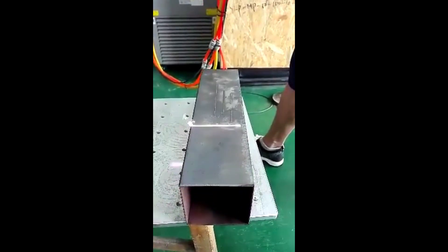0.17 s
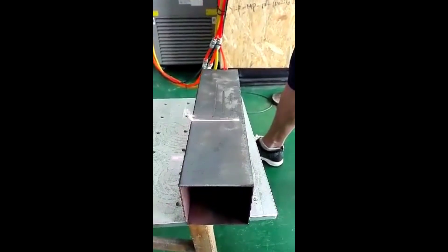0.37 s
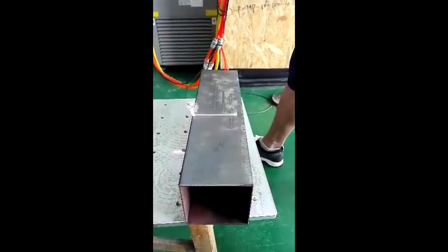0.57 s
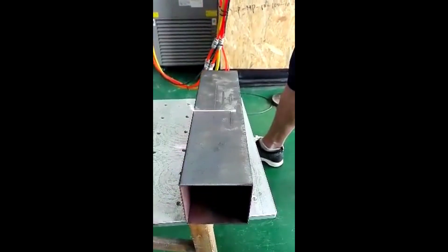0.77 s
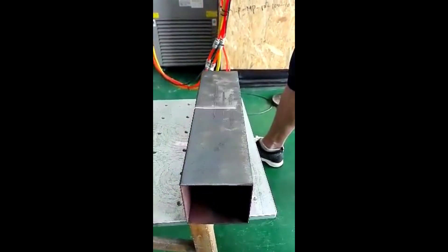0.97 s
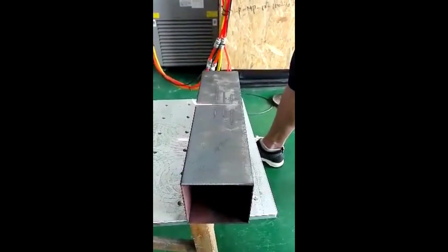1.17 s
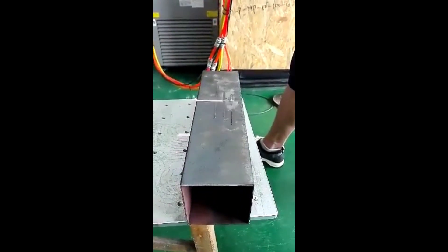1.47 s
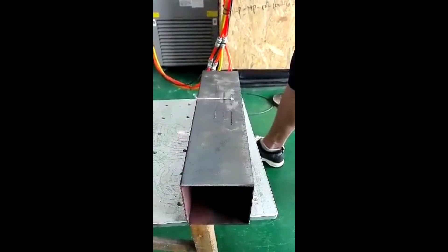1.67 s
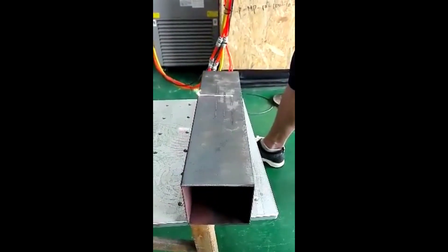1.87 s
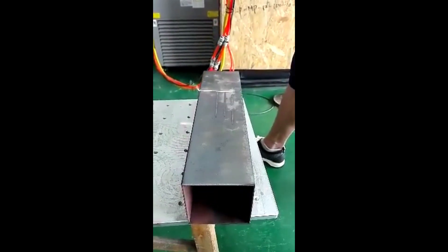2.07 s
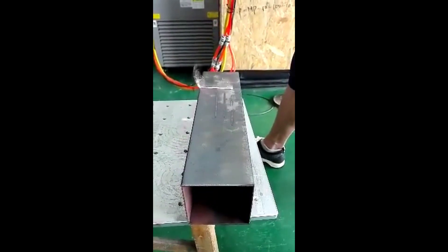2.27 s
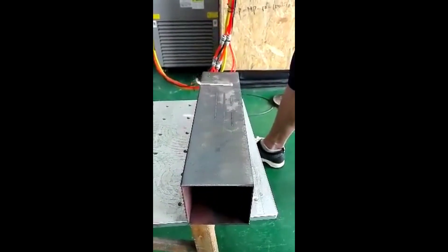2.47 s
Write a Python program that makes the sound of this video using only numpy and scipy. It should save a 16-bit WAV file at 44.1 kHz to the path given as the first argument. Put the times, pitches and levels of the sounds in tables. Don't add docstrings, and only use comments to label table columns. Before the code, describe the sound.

A laser cleaning a square steel tube buzzes continuously for about 2.6 seconds, a rapid low-pitched rasp of crackling snaps, with bright sizzle and a faint very high whine. It swells early, drops sharply near 0.95, returns abruptly around 1.0, dips again near 1.7 and 2.0, then stays strong to the end, ringing more metallically. A cooling fan roars steadily behind in the workshop.

```python
import sys
import numpy as np
from scipy import signal
from scipy.fft import rfft, irfft, dct, next_fast_len
from scipy.io import wavfile
from scipy.ndimage import uniform_filter1d

SR = 44100
rng = np.random.default_rng(int(sys.argv[2]) if len(sys.argv) > 2 else 0)


def master(y):
    cut = np.clip(np.atleast_2d(y).T, -1, 1)
    pcm = np.round(cut * 32767)
    wavfile.write(sys.argv[1], SR, pcm.astype(np.int16))


def invert_db(level):
    return 10 ** (np.asarray(level, dtype=float) / 20)


N = 115542
PAD = next_fast_len(N + 4096)
HZ = np.maximum(np.arange(PAD // 2 + 1) * SR / PAD, 1)
TIME = np.arange(N) / SR
ALONG = TIME / TIME[-1]
SWEEP_HZ, PULSE_HZ = 94.73, 13995.5
CUTOFF_HZ = 14230


def rms_one(x):
    return x / np.sqrt(np.mean(x ** 2) + 1e-20)


def at_hz(points):
    hz, level_db = np.transpose(points)
    return np.interp(np.log(HZ), np.log(hz), level_db)


def filtered(x, response):
    return irfft(rfft(x, PAD) * response, PAD)[..., :N]


def causal(db):
    cepstrum = irfft(np.log(invert_db(db)), PAD)
    cepstrum[..., 1:PAD // 2] *= 2
    cepstrum[..., PAD // 2 + 1:] = 0
    return np.exp(rfft(cepstrum))


def coloured(x, spectrum):
    # (frequency [Hz], difference [dB])
    left_lean = [(60, -1.5), (130, 0), (290, 0), (640, 2), (1400, -2), (3070, 0), (6730, 10), (14800, 2.5)]
    lean_db = at_hz(left_lean) * [[.5], [-.5]]
    out = filtered(x, causal(at_hz(spectrum) + lean_db))
    return out / np.sqrt(np.mean(out.mean(axis=0) ** 2))


def drift(rate_hz, channels=1):
    noise = rng.standard_normal((channels, PAD))
    return rms_one(filtered(noise, 1 / (1 + (HZ / rate_hz) ** 2)))


def about_mean(curve):
    level_db = np.interp(TIME, *np.transpose(curve))
    return level_db - level_db.mean()


def fan():
    # (frequency [Hz], level [dB])
    air_colour = [(25, -7), (70, -6.5), (130, -0.5), (220, -5), (400, -14), (600, -16), (1500, -11),
                  (2500, -12.5)]
    # (frequency [Hz], correlation [-1 to 1])
    likeness = [(130, 1), (290, 0.87), (600, -0.42), (1400, .05)]
    # (frequency [Hz], width [Hz], level [dB])
    cabinet_hum = [(110.5, 12, -40.5), (159.4, 24, -42.5), (831, 100, -47)]
    # (time [s], level [dB])
    gusts = [(0.0, -35), (0.02, -32), (0.58, -33.5), (0.6, -36), (0.81, -28), (0.87, -32), (1.12, -32.5),
             (1.2, -33), (1.37, -32), (1.83, -32.5), (1.87, -30.5), (1.92, -33), (2.44, -33), (2.47, -31),
             (2.49, -32), (2.62, -36.5)]
    roar_db, hiss_db, cut_hz = -29.5, -26, 4210
    gust_share, gust_top_hz = 0.88, 298

    mid, side = rng.standard_normal((2, PAD))
    alike = np.clip(at_hz(likeness), -1, 1)
    air = filtered(mid, np.sqrt(1 + alike)) + filtered(side, np.sqrt(1 - alike)) * [[1], [-1]]
    air = filtered(air, invert_db(hiss_db) + 1 / (1 + (HZ / cut_hz) ** 6))
    roar = invert_db(roar_db) * coloured(air, air_colour)
    for hz, width_hz, level_db in cabinet_hum:
        hum = filtered(rng.standard_normal(PAD), 1 / (1 + (2 * (HZ - hz) / width_hz) ** 2))
        roar = roar + invert_db(level_db) * rms_one(hum)
    bass = filtered(roar, 1 / (1 + (HZ / gust_top_hz) ** 4))
    return roar + bass * (invert_db(gust_share * about_mean(gusts)) - 1)


def pulse_whine():
    # (time [s], level [dB])
    whine_level = [(0.0, -42), (0.25, -40.5), (0.32, -36), (0.56, -42.5), (0.61, -49), (0.81, -36),
                   (0.87, -45), (1.6, -49), (1.73, -49), (1.77, -46), (1.95, -37), (1.99, -53), (2.03, -41),
                   (2.22, -42), (2.25, -47), (2.31, -44), (2.56, -38.5), (2.62, -50)]
    # (multiple of the sweep rate [1], level [dB])
    sidebands = [
        (-1, -13),
        (1, -14),
        (2, -19),
    ]
    wander_depth, wander_hz = .35, 25.5
    left_db, right_db = -33, -45

    carrier = np.exp(2j * np.pi * PULSE_HZ * TIME)
    throb = 1 + sum(invert_db(db) * np.exp(2j * np.pi * k * SWEEP_HZ * TIME) for k, db in sidebands)
    chance = drift(wander_hz, channels=4)
    wander = 1 + wander_depth * (chance[:2] + 1j * chance[2:])
    tone = (carrier * throb * wander).real * invert_db([[left_db], [right_db]])
    return invert_db(about_mean(whine_level)) * tone


def burn():
    # (time [s], level [dB])
    burn_level = [(0.0, -41.5), (0.17, -34.5), (0.36, -34.5), (0.57, -31), (0.66, -37), (0.811, -35.5),
                  (0.888, -47), (0.959, -52), (1.019, -32.5), (1.36, -40.5), (1.4, -37.5), (1.52, -34.5),
                  (1.72, -49), (1.778, -31.5), (1.951, -34), (2.0, -44), (2.21, -32.5), (2.62, -30)]
    # (time [s], half length [s], level [dB])
    spots = [(0.202, 0.023, -6), (0.241, .018, 6), (.53, 0.042, 1), (0.774, 0.017, -1),
             (1.191, 0.041, -0.5), (1.513, 0.018, 2), (1.615, .03, 1), (2.042, 0.0089, 2.5),
             (2.136, 0.02, 2), (2.247, 0.024, -1.5), (2.401, .03, 3.5), (2.491, 0.011, 3),
             (2.57, 0.025, 3.5)]
    flicker_db, flicker_hz = 1.0, 16

    s, level_db = np.transpose(burn_level)
    mean_db = level_db.mean()
    spots_db = sum(db * np.exp(-((TIME - at) / half) ** 2) for at, half, db in spots)
    swing_db = np.interp(TIME, s, level_db) - mean_db + spots_db
    return mean_db, swing_db + flicker_db * drift(flicker_hz), spots_db


def surface(fresh):
    memory_sweeps = 14.0
    kept = np.exp(-1 / memory_sweeps)
    comb = 1 / (1 - kept * np.exp(-2j * np.pi * HZ / SWEEP_HZ))
    pattern = rms_one(filtered(rng.standard_normal((2, PAD)), comb))
    return np.sqrt(1 - fresh ** 2) * pattern + fresh * rng.standard_normal((2, N))


def edge_snaps():
    # (time [s], place in the sweep [s])
    far_edge = [(0, .0096), (.45, .00971), (.95, .00968), (1.3, .00974), (1.75, .00981), (1.95, .00981),
                (2.3, .00967), (2.62, .00963)]
    # (time [s], place in the sweep [s])
    near_edge = [(0, .00763), (.35, .0076), (.55, .00745), (1.1, .00743), (1.35, .00723), (1.74, .00706),
                 (1.78, .00692), (1.97, .00694), (2.03, .00707), (2.62, .00722)]
    # (direct sound [s], echo off the bench [s])
    right_lag_s = (.00015, .00156)
    spread_db, jitter_s = 1.3, 1.6e-5

    starts = np.arange(-1, N / SR * SWEEP_HZ - 1) / SWEEP_HZ
    out = np.zeros((2, 3, N + SR))
    for edge, track in enumerate((far_edge, near_edge)):
        chance = rng.standard_normal((len(starts), 2))
        size = -invert_db(spread_db * chance[:, 0])
        arrival_s = starts + np.interp(starts, *np.transpose(track)) + jitter_s * chance[:, 1]
        for path, lag_s in enumerate((0, *right_lag_s)):
            at = (arrival_s + lag_s) * SR
            whole = np.floor(at).astype(int)
            for tap in range(-4, 6):
                out[edge, path, whole + tap] += size * np.sinc(whole + tap - at)
    return out[..., :N]


def at_ears(snaps, strengths, far_fade_db):
    far, near = snaps
    far_gain, near_gain = np.split(invert_db(strengths), 2, axis=1)
    far = far * invert_db(far_fade_db * (ALONG - 2.0))
    ears = np.array([[0.96, 0, 0.15], [0.032, 0.99, 0.87]])
    return ears @ (far * far_gain + near * near_gain)


def sizzle(snaps, swing_db):
    # (far edge [dB], near edge [dB])
    edge_strengths = [
        (17, 21),
        (6, 12),
        (12, 18),
    ]
    # (frequency [Hz], level per Hz [dB])
    sizzle_colour = [(6000, -26), (7300, -14), (8000, -18), (9200, -13.5), (11000, -10), (12300, -5.5),
                     (13300, -5.5), (14150, -4.5)]
    follows = 0.94

    buzz = surface(fresh=.72) + at_ears(snaps, edge_strengths, far_fade_db=-5)
    below_pulse = filtered(buzz, HZ < PULSE_HZ / 2)
    mirrored = below_pulse * np.cos(2 * np.pi * PULSE_HZ * TIME)
    return coloured(mirrored, sizzle_colour) * invert_db(follows * swing_db)


def crackle(snaps, swing_db):
    # (far edge [dB], near edge [dB])
    edge_strengths = [
        (25, 18),
        (17, 13),
        (10, 6),
    ]
    # (frequency [Hz], level [dB])
    snap_tilt = [(2000, -2), (4000, 0), (6000, 5), (9000, 9)]
    # (frequency [Hz], width [Hz], first level [dB], last level [dB])
    wall_ring = (4770, 260, 1, 12.5)
    # (frequency [Hz], level per Hz [dB])
    crackle_colour = [(500, -10), (1200, -21.5), (2200, -2), (3300, -2.5), (4700, -7.5), (6000, -13),
                      (7500, -21), (10000, -29.5)]
    snap_db = -5
    grit_follows = 0.93

    struck = at_ears(snaps, edge_strengths, far_fade_db=0) * invert_db(swing_db + snap_db)
    struck = filtered(struck, causal(at_hz(snap_tilt)))
    hz, width_hz, first_db, last_db = wall_ring
    resonance = 1 / (1 + 1j * (HZ ** 2 - hz ** 2) / (HZ * width_hz))
    ring = filtered(struck * invert_db(first_db + (last_db - first_db) * ALONG), resonance)
    grit = surface(fresh=.7) * invert_db(grit_follows * swing_db)
    return coloured(grit + struck + ring, crackle_colour)


def laser():
    mean_db, swing_db, spots_db = burn()
    snaps = edge_snaps() * invert_db(.6 * spots_db)
    burning = invert_db(5.5) * crackle(snaps, swing_db) + invert_db(2) * sizzle(snaps, swing_db)
    return invert_db(mean_db) * burning + pulse_whine()


def scene():
    return fan() + laser()


def coarse_rounding(x):
    # (frequency [Hz], step [dB])
    coarseness = [(300, -10), (1500, 1.5), (2800, 4.5), (4700, -3), (6200, 0), (8000, 4), (10500, 3),
                  (13900, 1)]
    hop, band_bins, block_start = 1024, 16, 416
    spread_db, shared = 8, .55

    count, half = N // hop + 3, hop // 2
    window = signal.windows.kaiser_bessel_derived(2 * hop, 4 * np.pi)
    lead = 2 * hop - block_start
    padded = np.pad(x, ((0, 0), (lead, (count + 1) * hop - N - lead))).reshape(2, -1, hop)
    frames = np.concatenate([padded[:, :-1], padded[:, 1:]], axis=2) * window
    a, b, c, d = np.split(frames, 4, axis=2)
    folded = np.concatenate([-c[..., ::-1] - d, a - b[..., ::-1]], axis=2)
    lines = dct(folded, type=4, norm="ortho")

    power = np.mean(lines.reshape(2, count, -1, band_bins) ** 2, axis=3)
    level_db = 10 * np.log10(uniform_filter1d(power, size=5, axis=1) + 1e-14)
    chance = uniform_filter1d(rng.standard_normal(level_db.shape), size=3, axis=1)
    level_db += shared * (level_db.max(axis=0) - level_db) + spread_db * chance
    hz = (np.arange(hop) + .5) * SR / 2 / hop
    step = invert_db(np.repeat(level_db, band_bins, axis=2) + np.interp(hz, HZ, at_hz(coarseness)))
    lines = np.sign(lines) * np.floor(np.abs(lines) / step + .4) * step * (hz < CUTOFF_HZ)

    back = dct(lines, type=4, norm="ortho")
    late, early = back[..., :half], back[..., half:]
    blocks = np.concatenate([early, -early[..., ::-1], -late[..., ::-1], -late], axis=2) * window
    joined = (blocks[:, :-1, hop:] + blocks[:, 1:, :hop]).reshape(2, -1)
    return joined[:, lead - hop:lead - hop + N]


def high_ticks():
    # (time [s], level [dB])
    tick_levels = [(.2315, -32), (.242, -24), (.2527, -24), (.745, -36), (1.508, -30), (1.62, -36)]
    s, level_db = np.transpose(tick_levels)
    clicks = np.zeros(N)
    clicks[(s * SR).astype(int)] = invert_db(level_db)
    band = np.exp(-((HZ - CUTOFF_HZ) / 480) ** 2)
    return filtered(clicks, band) * invert_db([[9], [3]])


def roll_off(x):
    return signal.sosfilt(signal.butter(12, 15390, fs=SR, output="sos"), x)


def record(dry):
    overload, offset = .75, -.0026
    rounded = coarse_rounding(overload * np.tanh(dry / overload))
    mix = rounded + offset + high_ticks()
    return roll_off(mix)


dry = scene()
out = record(dry)
master(out)
```